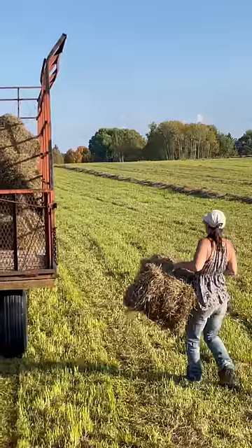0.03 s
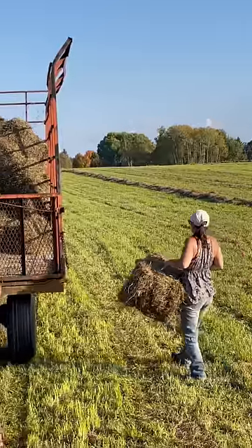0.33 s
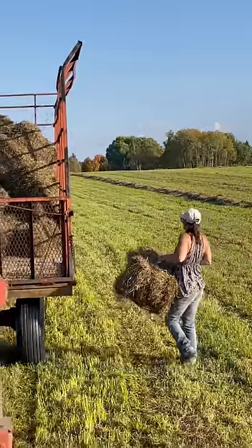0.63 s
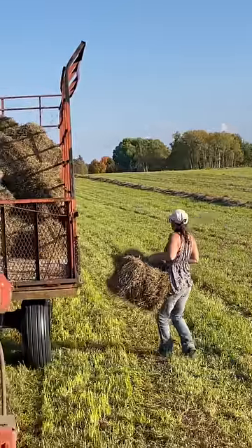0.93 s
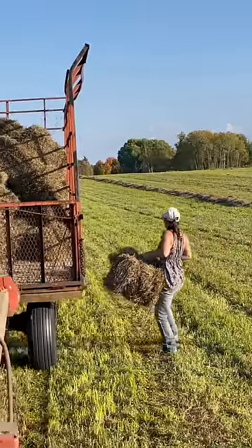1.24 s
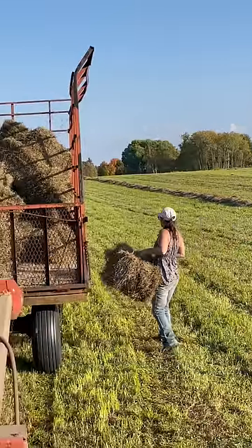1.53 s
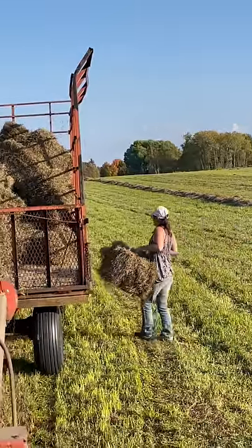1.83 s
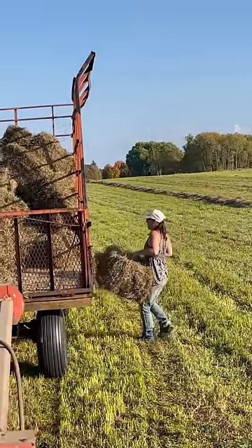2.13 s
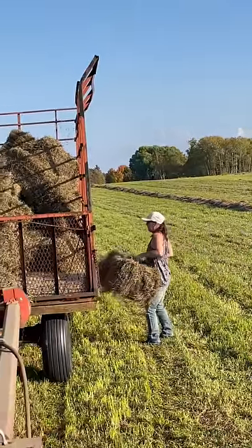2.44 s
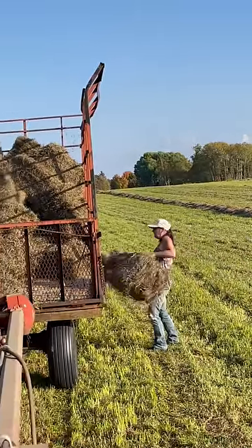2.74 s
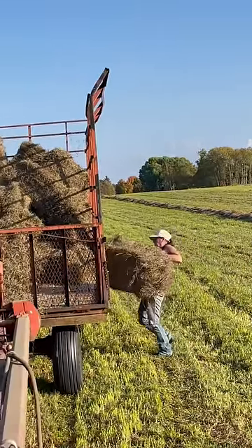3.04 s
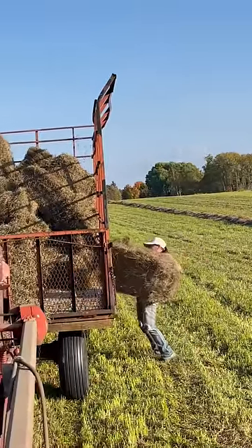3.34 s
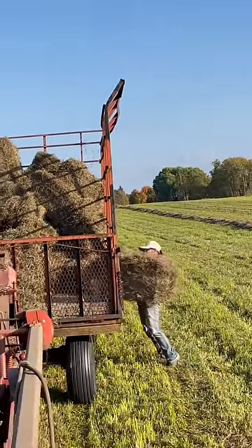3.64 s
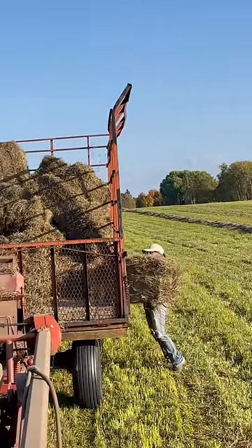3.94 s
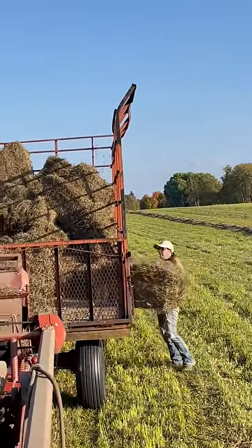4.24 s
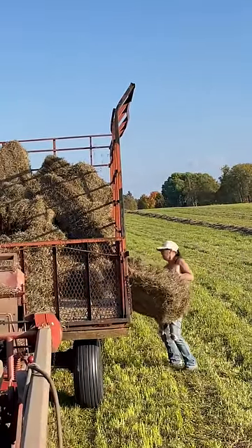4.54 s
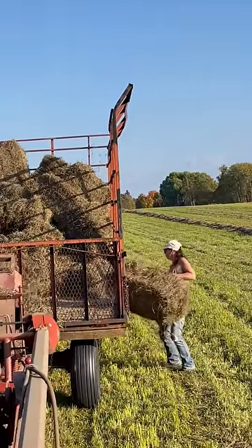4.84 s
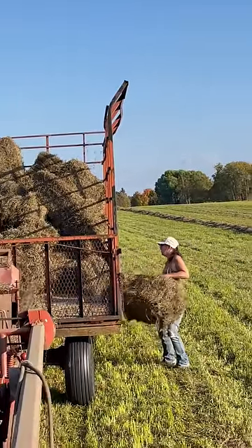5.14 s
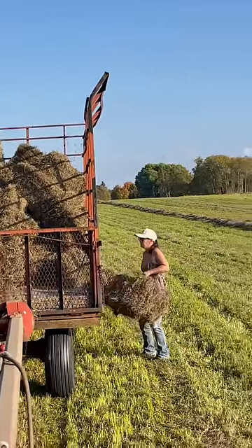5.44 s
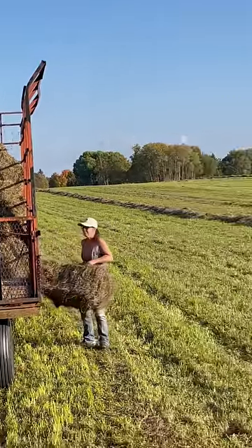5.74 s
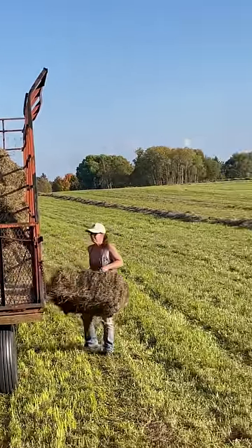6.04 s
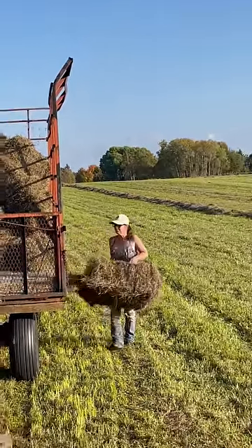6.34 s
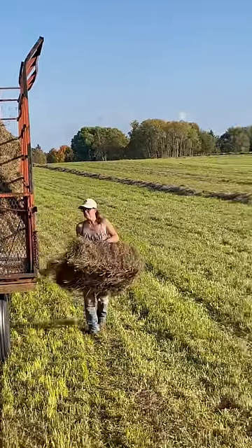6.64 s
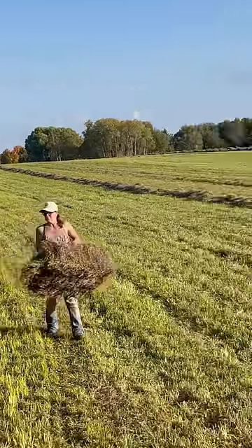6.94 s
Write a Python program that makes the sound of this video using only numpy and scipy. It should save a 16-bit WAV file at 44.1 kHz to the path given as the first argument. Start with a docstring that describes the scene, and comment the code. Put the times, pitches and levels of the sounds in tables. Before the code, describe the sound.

Heard in stereo from a tractor in a hay field, a diesel engine roars evenly beneath the constant metallic rattle of a working baler. Seven crunching thumps come at a regular pace, roughly a second apart, as hay is packed into the chamber, each with a shake of chains. Scattered clanks, hitch knocks and short low booms from the wagon fall around the strokes, and the machinery keeps running throughout.

```python
"""Tractor baling hay

A diesel tractor pulls a small square baler and a hay wagon over a field. The engine drones while
the pickup, which lifts the hay, clatters on. About once a second a plunger rams hay into the bale
chamber with a thump, a crunch and a jingle of chains. Loose steel clinks and the wagon booms.
It is all heard from the tractor, through two microphone openings (ports) close together."""
import sys
import numpy as np
from scipy import signal
from scipy.fft import rfft, irfft, next_fast_len
from scipy.io import wavfile
from scipy.ndimage import map_coordinates

SR = 44100
rng = np.random.default_rng(int(sys.argv[2]) if len(sys.argv) > 2 else 0)


def wav_out(sig):
    """Save sig, one row per channel (or a flat mono array), as 16-bit PCM at SR to the path in sys.argv[1]."""
    wavfile.write(sys.argv[1], SR, np.round(np.clip(np.atleast_2d(sig).T, -1, 1) * 32767).astype(np.int16))


N = 316638

# Levels in the tables are relative: the functions add their own gains.
# how often the engine fires: t/s, f/Hz
FIRING_RATE = [(0, 59.6), (1, 59.33), (1.8, 59.3), (2.4, 60.1), (3.3, 59.82), (4.2, 60), (5.2, 60.1),
               (6.4, 59.96), (7.18, 59.94)]
# tones of the exhaust: multiple of the firing rate, level/dB
EXHAUST_TONES = [(1, -32), (2, -32.3), (3, -42), (4, -38.5)]
# whines of the gears: multiple of the firing rate, level/dB, phase waver/rad
GEAR_TONES = [(29.93, -3.5, 3.3), (27.42, -6, 2)]
# how much the fan hum wavers: t/s, phase waver/rad
FAN_UNSTEADINESS = [(0, 1.7), (2.7, 1.9), (3.2, .4), (3.9, 1), (5.7, .7), (6.1, .2)]
# loudness over time: t/s, level/dB
FAN_LEVEL = [(.1, -28), (.45, -31), (.7, -28), (1, -35), (1.4, -30), (1.9, -28.5), (2.3, -28), (2.6, -32),
             (2.98, -33), (3.2, -25.5), (3.55, -26), (3.9, -32), (4.15, -29), (4.55, -28), (5.35, -30),
             (5.55, -26), (5.85, -31), (6.2, -25), (6.5, -24.5), (6.64, -28), (6.8, -23.5), (7.18, -23.5)]
GEAR_LEVEL = [(0, -47), (3.2, -43.5), (3.8, -43), (4.4, -37), (5.5, -42), (6.2, -37), (7.1, -41)]
PICKUP_LEVEL = [(0, -26), (1.5, -25), (3.3, -24), (5, -24.5), (7.18, -24)]

# the plunger pushes in: t/s, clatter/dB, boom/dB, crunch/dB, chain/dB, chain fade/s
PLUNGER_STROKES = [(.735, -24.5, -26, -21, -31.5, 0.11), (1.69, -23, -24, -16.5, -25.5, 0.11),
                   (2.645, -22, -17.5, -17, -26, 0.091), (3.6, -21, -19, -23, -30, 0.049),
                   (4.535, -22.5, -39, -17.5, -31.5, 0.089), (5.495, -23.5, -17, -20, -28, 0.11),
                   (6.42, -24, -22, -20, -31.5, 0.11)]
# it turns round at the back of its travel: t/s, clatter/dB, boom/dB
PLUNGER_RETURNS = [(.12, -36, -27), (1.16, -27, -25), (2.14, -27, -23), (3.09, -26, -22),
                   (3.96, -27.5, -21), (5.04, -27, -21), (5.96, -32, -23), (6.87, -30, -21)]
# single blows: t/s, level/dB
STEEL_CLINKS = [(0.7332, -19), (0.7898, -23), (0.9812, -20), (1.6937, -20), (1.7281, -16), (1.7484, -13),
                (1.8043, -18), (1.8886, -16), (2.0045, -27), (2.6484, -14.5), (2.686, -16), (2.79, -20),
                (3.655, -21), (4.5362, -28), (4.6129, -16), (5.5263, -18), (5.5629, -18), (5.6246, -18),
                (5.887, -18), (5.968, -25), (6.3764, -19), (6.7851, -24), (6.8369, -21), (6.9202, -20)]  # loose parts strike
LINKAGE_CLANKS = [(1.6735, -20), (1.754, -23), (1.8688, -21), (2.6263, -26), (2.662, -21), (2.684, -20),
                  (2.7892, -23), (3.618, -19), (4.511, -21), (5.462, -20), (5.6263, -24), (6.4075, -30)]  # the plunger's rods take up their slack
HITCH_KNOCKS = [(0.7118, -26), (1.1633, -20), (2.1271, -13.8), (2.25, -20.5), (2.6663, -17), (3.078, -21),
                (4.1157, -21), (4.6922, -24), (5.8992, -19), (6.3761, -24)]  # the tow coupling knocks
HAY_SLAMS = [(.737, -20), (1.697, -19), (1.77, -16), (2.111, -18), (2.635, -20), (2.667, -15.5),
             (2.697, -15), (2.765, -14.5), (3.06, -17), (5.117, -19), (5.484, -10.5), (5.557, -18),
             (6.4, -15), (6.498, -17.5)]  # wads of hay hit the chamber
# wagon and baler panels boom: t/s, f/Hz, level/dB
PANEL_BOOMS = [(1.8, 109, -22), (1.85, 268, -24), (2.14, 112, -27), (2.66, 84, -20.5), (2.72, 250, -22),
               (2.81, 274, -19), (3.69, 310, -26), (4.58, 262, -23), (4.68, 112, -26), (4.79, 114, -23),
               (5.05, 96, -29), (5.56, 265, -21), (5.59, 101, -27), (5.6, 57, -22), (5.69, 272, -22),
               (6.48, 258, -22)]

# the pitches at which each part rings: f/Hz, width/Hz, level/dB
ENGINE_MODES = [(181.5, 23, -6.5), (255.7, 35, -0.5), (397.5, 41, -5.5)]  # hollows of the bonnet and exhaust
FRAME_MODES = [(598, 28, 4), (989, 10, 2), (2277, 36, -4), (4096, 28, -5)]
GEAR_CASE_MODES = [(1648, 73, 3), (1790, 24, 4.5), (2100, 35, 0)]
CHAMBER_MODES = [(318, 59, 1), (385, 97, -2), (453, 41, 1.5), (570, 41, -9)]
LINKAGE_MODES = [(980, 260, 8), (1450, 350, -3), (2050, 250, 1), (2760, 340, 2.5), (3930, 460, -4.5),
                 (5200, 470, -5)]
HITCH_MODES = [(1100, 270, 0.5), (2200, 300, 5.5), (2900, 300, -4)]
# the tone colour of each noise, from bass to treble: f/Hz, level/dB
ENGINE_SPECTRUM = [(20, -50), (38, -19), (55, -13), (80, -1), (125, 1), (170, 0), (210, -0.5), (310, -5),
                   (500, -10.5), (900, -14.5), (2500, -21), (8000, -50)]
CLATTER_SPECTRUM = [(150, -15), (400, 4), (620, 0), (1050, 1), (1350, -4), (1780, -1.5), (2300, -5),
                    (3100, -8.5), (4400, -9), (5600, -15), (7000, -16), (9500, -18), (14000, -21)]
CHASSIS_SPECTRUM = [(22, -52), (34, -23), (52, 0), (100, 1.5), (140, -16), (400, -32)]
CHAIN_SPECTRUM = [(1500, -3), (4000, -1), (7000, 3), (10200, 4.5), (11200, 8.5), (12200, 1), (14000, -1.5)]
CRUNCH_SPECTRUM = [(90, -3), (200, -1), (300, 4), (420, 1), (750, -12.5), (1500, -12.5), (4000, -30)]
STALK_SPECTRUM = [(400, -6), (1000, 3), (3000, 0), (7000, -5), (11000, -11), (12500, -2), (14000, 6),
                  (15000, 0), (16000, -60)]

# sets how far the left port runs ahead of the right: f/Hz, phase/rad
LEFT_LEAD = [(1400, 0), (2600, .4), (3800, .7), (4600, 1.7), (5250, 5.3), (5850, 6.28), (6500, 6.9),
             (8100, 8.4), (8450, 9.2), (9500, 9.55), (9800, 10.1), (11200, 11.3), (11900, 12.3),
             (13300, 12.6), (15000, 14.2)]
# scattered sound that differs between the ports: f/Hz, level/dB
SCATTER = [(100, -36), (260, -27), (420, -20), (700, -12.5), (1400, -10), (1800, -21), (3000, -17),
           (5500, -40)]
# how much louder the left port is than the right: f/Hz, level/dB
LEFT_BOOST = [(100, .05), (300, .6), (700, 1.5), (1300, .6), (2400, 0)]
# the ports ring in the high treble: f/Hz, level/dB
MIC_RESPONSE = [(9500, 0), (10600, 4.5), (11250, 6.5), (11800, 0.5), (12300, -6.5), (13300, -17.5),
                (14500, -32), (15500, -34)]

REBOUND_LAG_S, REBOUND_WIDTH_S, REBOUND_DB = 0.156, 0.015, -6  # packed hay springs back after a stroke


def amp(db):
    """Turn decibels into a gain."""
    return 10 ** (np.asarray(db) / 20)


def unit(x):
    """Scale x to an average (rms) level of 1."""
    return x / np.sqrt(np.mean(x ** 2) + 1e-20)


def along(points, hz):
    """Read a table's value at hz, on a log frequency axis."""
    freqs, values = np.transpose(points)
    return np.interp(np.log(hz + 1), np.log(freqs + 1), values)


def clock():
    """The time of each sample, in seconds."""
    return np.arange(N) / SR


def curves(rows):
    """Join a table's points into one curve for each column after the time."""
    times, *columns = np.transpose(rows)
    return [np.interp(clock(), times, column) for column in columns]


def wobble(rate):
    """A smooth random curve through `rate` points a second."""
    return map_coordinates(rng.standard_normal(int(N * rate / SR) + 4), [clock() * rate])


def noise():
    """An even hiss (white noise)."""
    return rng.standard_normal(N)


def filtered(x, response):
    """Multiply each frequency in x by response(hz)."""
    size = next_fast_len(N + SR // 2)
    return irfft(rfft(x, size) * response(np.fft.rfftfreq(size, 1 / SR)), size)[..., :N]


def coloured(x, spectrum):
    """Give x a tone colour, at level 1."""
    return unit(filtered(x, lambda hz: amp(along(spectrum, hz))))


def ringing(x, modes):
    """Let x ring a part's modes, at level 1; the power 1.23 sharpens the peaks."""
    def response(hz):
        peaks = sum(amp(db) * 1j * hz * width / (f * f - hz * hz + 1j * hz * width)
                    for f, width, db in modes)
        return abs(peaks) ** 1.23
    return unit(filtered(x, response))


def bump(s, width):
    """A bell-shaped rise and fall around time s."""
    return np.exp(-((clock() - s) / width) ** 2 / 2)


def swell(s, rise, fade):
    """A loudness curve that builds up around time s, then dies away."""
    age = clock() - s
    return (1 + np.tanh(age / rise)) / 2 * np.exp(-(np.maximum(age, 0) / fade) ** 2 / 2)


def strikes(rows, life):
    """A loudness curve of sudden blows, each falling to about a third in `life` seconds."""
    blows = np.bincount([round(s * SR) for s, _ in rows], [amp(db) for _, db in rows], N)
    return signal.lfilter([1], [1, -np.exp(-1 / (life * SR))], blows)


def rattle(rate, scatter_db, life):
    """About `rate` random hits a second, each a short burst of noise of uneven size."""
    hits = (rng.random(N) < rate / SR) * amp(scatter_db * np.clip(noise(), -2, 2))
    energy = signal.lfilter([1], [1, -np.exp(-2 / (life * SR))], hits ** 2)
    return unit(np.sqrt(energy) * noise())


def tractor(jolt_db):
    """Engine firings make the exhaust drone and puff; fan, drive and gears hum in step with them."""
    (firing_hz,), (fan_db,), (gear_db,) = curves(FIRING_RATE), curves(FAN_LEVEL), curves(GEAR_LEVEL)
    # each stroke briefly slows the engine and makes it bark louder
    sag_hz = 0.602 * sum(bump(s + 0.259, width=0.0852) for s, *_ in PLUNGER_STROKES)
    labour_db = 2 * sum(bump(s + 0.062, width=0.062) for s, *_ in PLUNGER_STROKES)
    phase = 2 * np.pi * np.cumsum(firing_hz - sag_hz) / SR

    def tone(ratio, waver):
        return np.sqrt(2) * np.sin(ratio * phase + waver * wobble(7) + 2 * np.pi * rng.random())

    strain_db = 0.54 * (jolt_db - np.mean(jolt_db))  # load swells the lowest tones most
    exhaust = 0
    for k, db in EXHAUST_TONES:
        chug_db = 2.2 * (1 - .5 / k) * wobble(13)
        exhaust += amp(db + strain_db / k ** 2 + chug_db) * tone(k, waver=0.28)
    fan = amp(fan_db + 1.2 * wobble(12)) * tone(4.405, *curves(FAN_UNSTEADINESS))
    drive = amp(-33.5) * tone(3.24, waver=0.43)
    whine = sum(amp(gear_db + db + 2 * wobble(17)) * tone(k, waver) for k, db, waver in GEAR_TONES)
    puffs = 1 + 0.15 * np.cos(phase)
    bark = amp(-24.5 + labour_db) * ringing(puffs * noise(), ENGINE_MODES)
    rumble = amp(-24) * coloured(puffs * noise(), ENGINE_SPECTRUM)
    return exhaust + fan + drive + whine + bark + rumble


def shaking():
    """Clatter level in dB: hay feeding in unevenly, plus each stroke, rebound and return."""
    pickup_db, = curves(PICKUP_LEVEL)
    power = amp(pickup_db + .5 * wobble(14)) ** 2
    for s, db, *_, fade in PLUNGER_STROKES:
        # the frame rattles as the plunger meets the hay, and outlasts the chains
        power += (amp(db) * swell(s - 0.032, rise=0.011, fade=1.87 * fade)) ** 2
        power += (amp(db + REBOUND_DB) * bump(s + REBOUND_LAG_S, REBOUND_WIDTH_S)) ** 2
    power += sum((amp(db) * bump(s, width=0.058)) ** 2 for s, db, _ in PLUNGER_RETURNS)
    return 10 * np.log10(power)


def jolting():
    """Boom level in dB: bumpy ground, plus a jolt at each end of the plunger's travel."""
    power = amp(-28.5 + 4 * wobble(14)) ** 2
    power += sum((amp(db) * bump(s + 0.079, width=0.087)) ** 2 for s, _, db, *_ in PLUNGER_STROKES)
    power += sum((amp(db) * bump(s, width=0.12)) ** 2 for s, _, db in PLUNGER_RETURNS)
    return 10 * np.log10(power)


def frame(shake_db, jolt_db):
    """Pickup prongs and gears clatter over the rush of hay and ring the steel; the chassis booms."""
    gear_db, = curves(GEAR_LEVEL)
    contacts = rattle(rate=420, scatter_db=3.5, life=0.011) + 1.38 * noise()
    clatter = amp(shake_db) * coloured(contacts, CLATTER_SPECTRUM)
    panels = amp(shake_db - 11) * ringing(noise(), FRAME_MODES)
    gear_case = amp(gear_db - 4) * ringing(contacts, GEAR_CASE_MODES)
    chassis = amp(jolt_db - 5.5) * coloured(noise(), CHASSIS_SPECTRUM)
    return clatter + panels + gear_case + chassis


def chains():
    """Chain links tick softly all the time and jingle at each stroke."""
    shaken = sum(amp(db) * swell(s, rise=0.0078, fade=fade) for s, *_, db, fade in PLUNGER_STROKES)
    jingle = coloured(rattle(rate=260, scatter_db=3.5, life=0.0031), CHAIN_SPECTRUM)
    ticks = coloured(rattle(rate=70, scatter_db=2.5, life=0.0035), CHAIN_SPECTRUM)
    return shaken * jingle + amp(-42.5 + 0.78 * wobble(6)) * ticks


def plunger():
    """Each stroke crunches the hay, which thuds in the chamber as it packs tight, then springs back."""
    crunch = thud = 0
    for s, _, _, db, _, fade in PLUNGER_STROKES:
        rebound = amp(REBOUND_DB) * bump(s + REBOUND_LAG_S, REBOUND_WIDTH_S)
        crunch += amp(db) * (swell(s, rise=0.035, fade=0.64 * fade) + rebound)
        thud += amp(db - 12) * bump(s + 0.073, width=0.08)
    return crunch * coloured(noise(), CRUNCH_SPECTRUM) + thud * ringing(noise(), CHAMBER_MODES)


def loose_steel():
    """Steel hits steel and rings briefly: the hitch knocks, small parts clink, the linkage clanks."""
    knocks = strikes(HITCH_KNOCKS, life=.008) * ringing(noise(), HITCH_MODES)
    clinks = amp(-2.5) * strikes(STEEL_CLINKS, life=.0052) * coloured(noise(), CHAIN_SPECTRUM)
    clanks = strikes(LINKAGE_CLANKS, life=.011) * ringing(noise(), LINKAGE_MODES)
    return knocks + clinks + clanks


def hay_thumps():
    """Each wad of hay slammed into the chamber gives it a sudden, short thump."""
    return amp(-3) * strikes(HAY_SLAMS, life=.036) * ringing(noise(), CHAMBER_MODES)


def wagon():
    """Bumps and strokes draw short, low booms from the panels of wagon and baler."""
    booms = 0
    for s, hz, db in PANEL_BOOMS:
        tone = np.sqrt(2) * np.sin(2 * np.pi * (hz * clock() + rng.random()))
        booms += amp(db) * bump(s, width=0.027) * tone
    return booms


def knife():
    """The knife snaps through a thick wad of dry stalks with one bright crack."""
    stalks = rattle(rate=1500, scatter_db=2.5, life=.003)
    return amp(-23) * swell(3.599, rise=.002, fade=.017) * coloured(stalks, STALK_SPECTRUM)


def hay_groan(s=3.608, width=0.021):
    """Packed hay rubs along the chamber with one short, rough, falling groan."""
    hz = 480 - 50 * np.tanh((clock() - s) / width) + 45 * wobble(200)
    tone = np.sqrt(2) * np.sin(2 * np.pi * np.cumsum(hz) / SR)
    return amp(-17.3 + 2 * wobble(120)) * bump(s, width) * tone


def machines(shake_db, jolt_db):
    """All the sounds of tractor, baler and wagon, added up."""
    running = tractor(jolt_db) + frame(shake_db, jolt_db) + chains()
    return running + plunger() + loose_steel() + hay_thumps() + wagon() + knife() + hay_groan()


def scene():
    """Direct sound reaches the two ports slightly out of step; scattered sound adds width."""
    shake_db, jolt_db = shaking(), jolting()
    direct, scattered = machines(shake_db, jolt_db), machines(shake_db, jolt_db)
    half_lead = lambda hz: along(LEFT_LEAD, hz) / 2
    scatter_gain = lambda hz: np.hypot(0.66 * np.sin(half_lead(hz)), amp(along(SCATTER, hz)))
    balance = lambda hz: amp([along(LEFT_BOOST, hz) / 2, -along(LEFT_BOOST, hz) / 2])
    mid = filtered(direct, lambda hz: np.cos(half_lead(hz)))  # what the ports share
    side = filtered(direct, lambda hz: .78j * np.sin(half_lead(hz)))  # what sets them apart
    side += filtered(scattered, scatter_gain)
    return filtered(np.array([mid + side, mid - side]), balance)


def record(dry, start_s=.036, top_hz=15600):
    """After a moment of silence, the microphone rings in the high treble and passes nothing higher."""
    return filtered(dry * (clock() > start_s), lambda hz: amp(along(MIC_RESPONSE, hz)) * (hz < top_hz))


dry = scene()
out = record(dry)
wav_out(out)
```